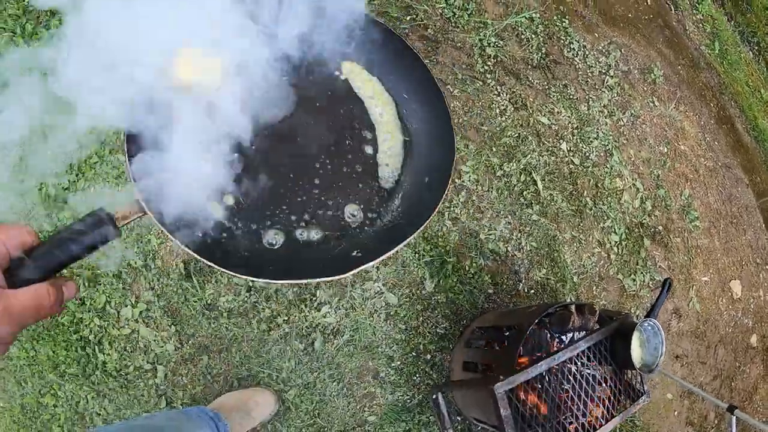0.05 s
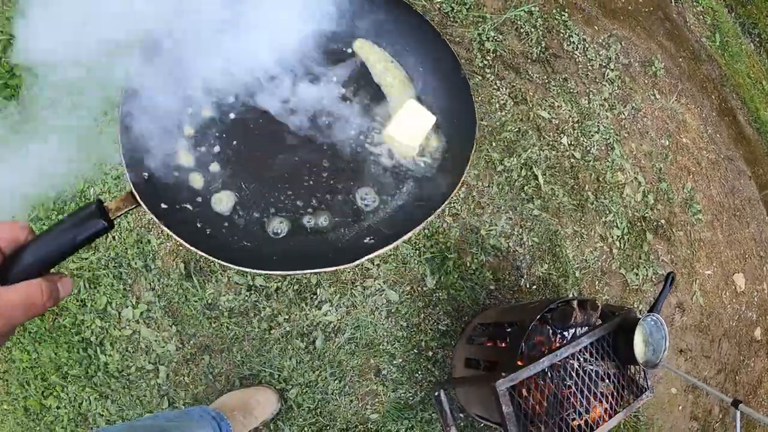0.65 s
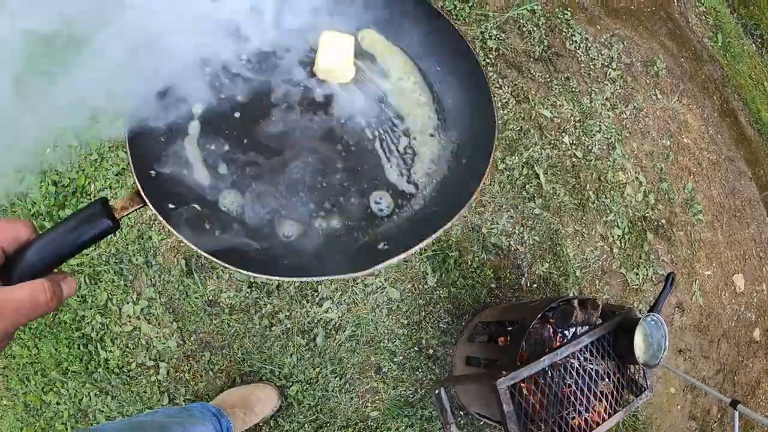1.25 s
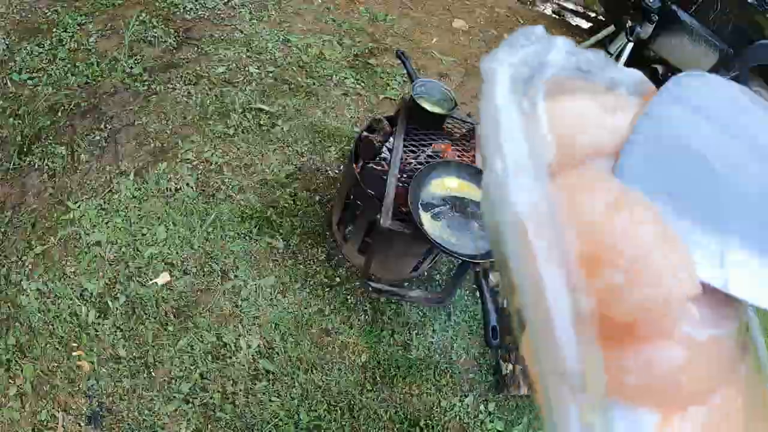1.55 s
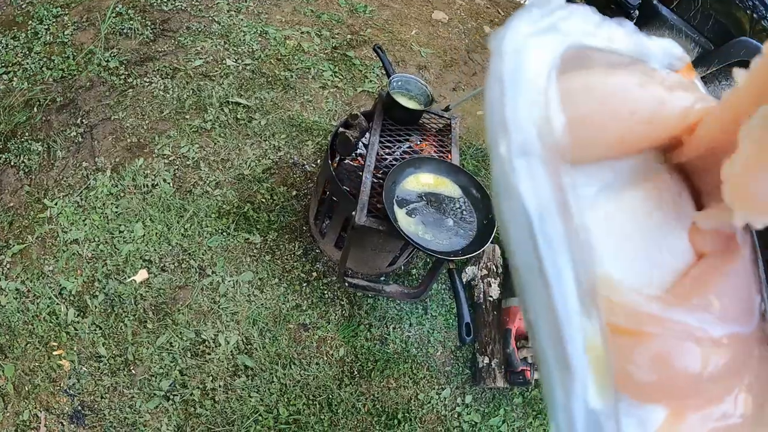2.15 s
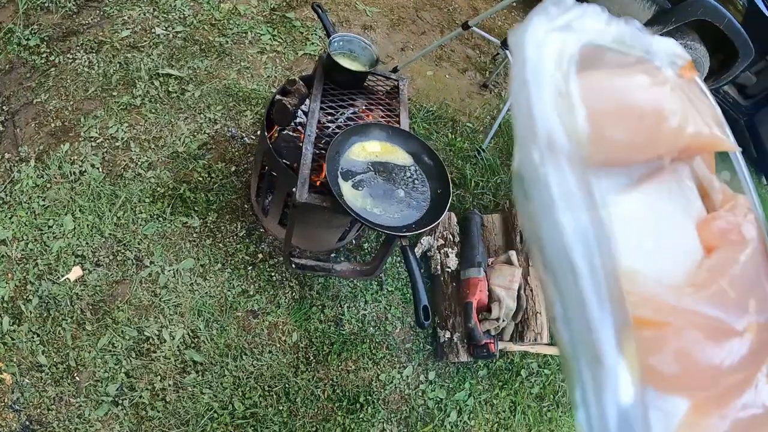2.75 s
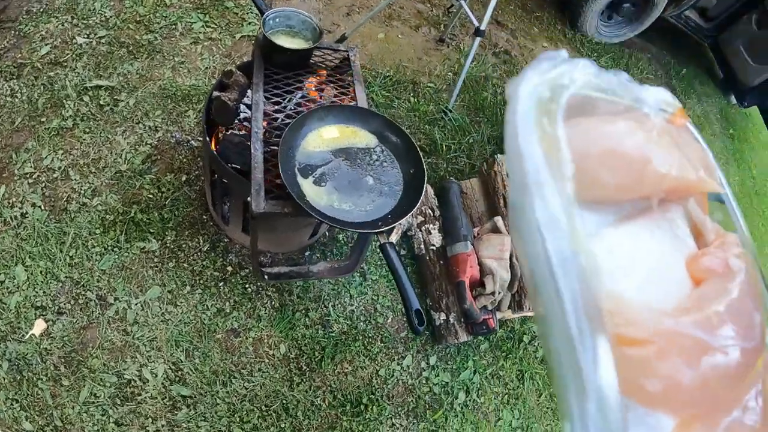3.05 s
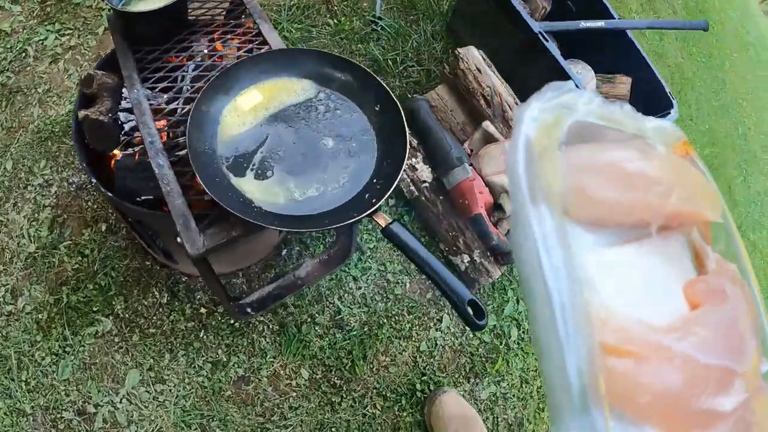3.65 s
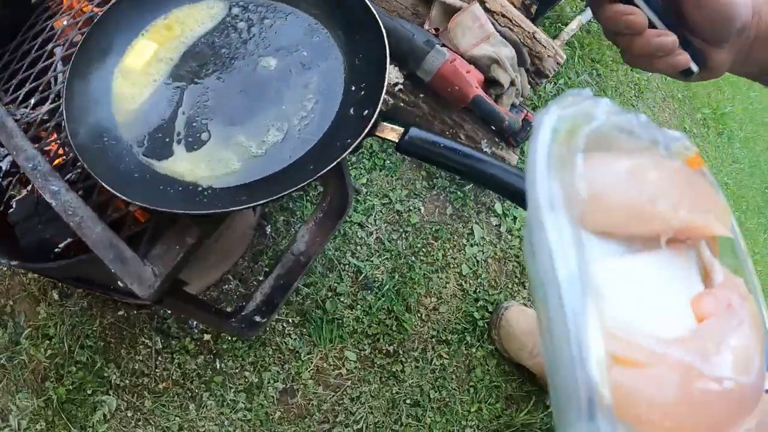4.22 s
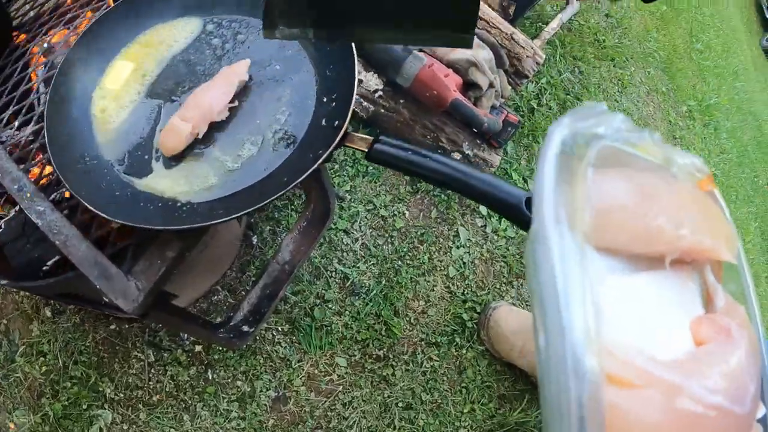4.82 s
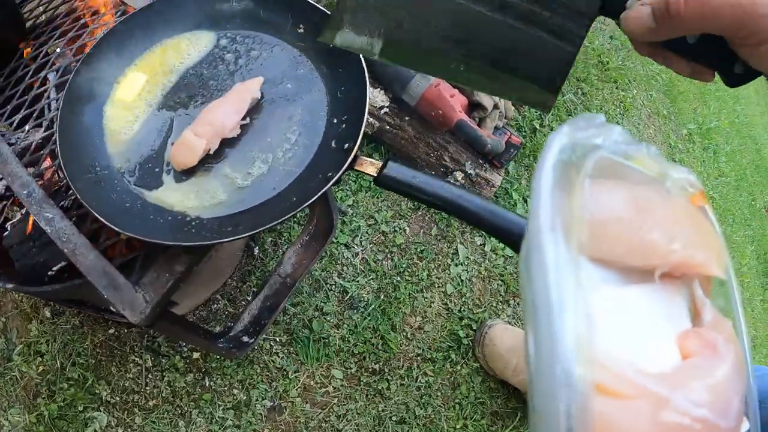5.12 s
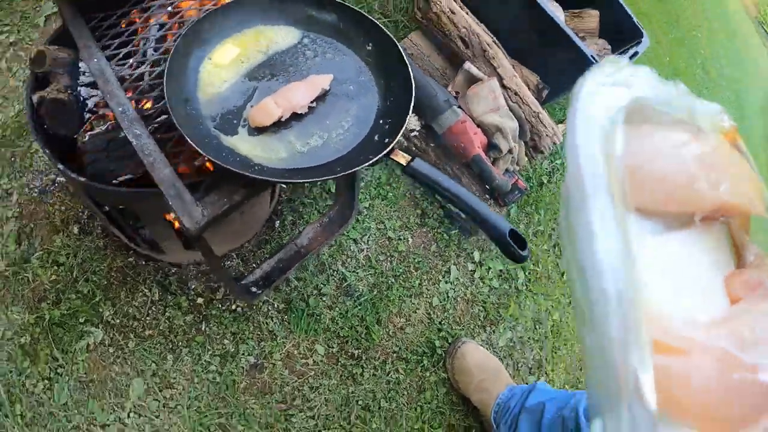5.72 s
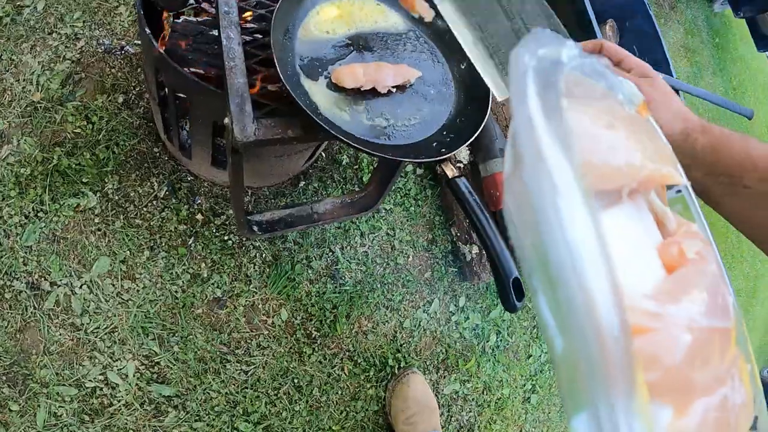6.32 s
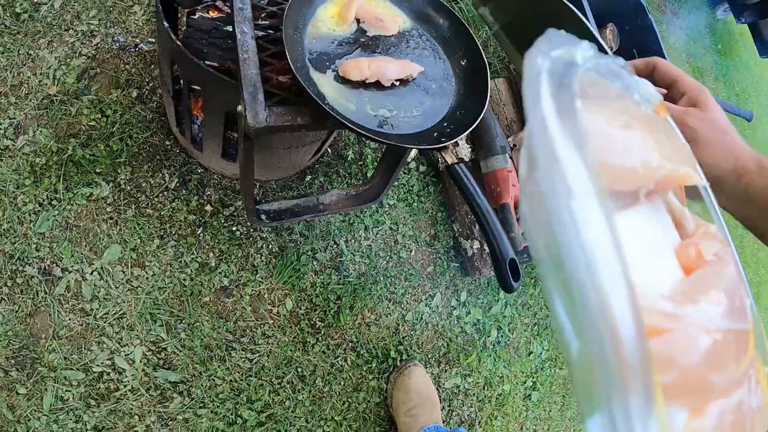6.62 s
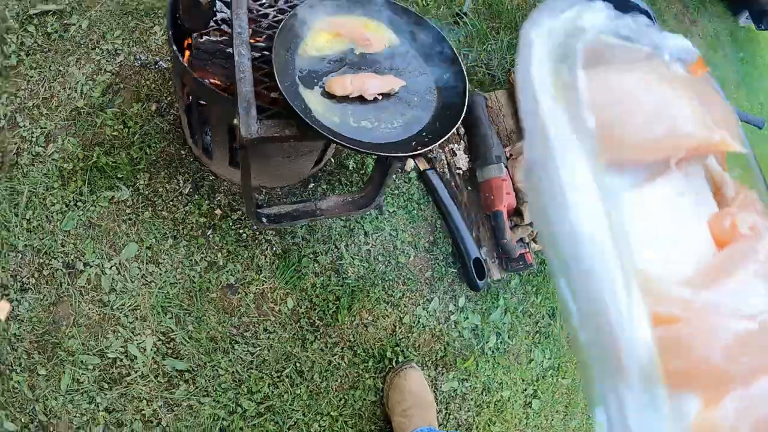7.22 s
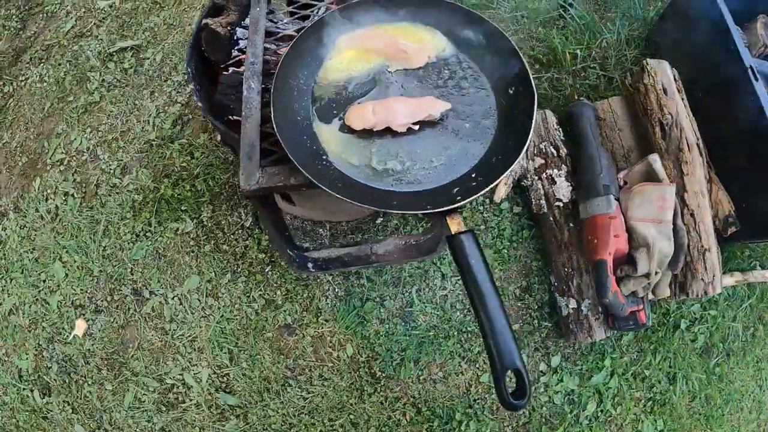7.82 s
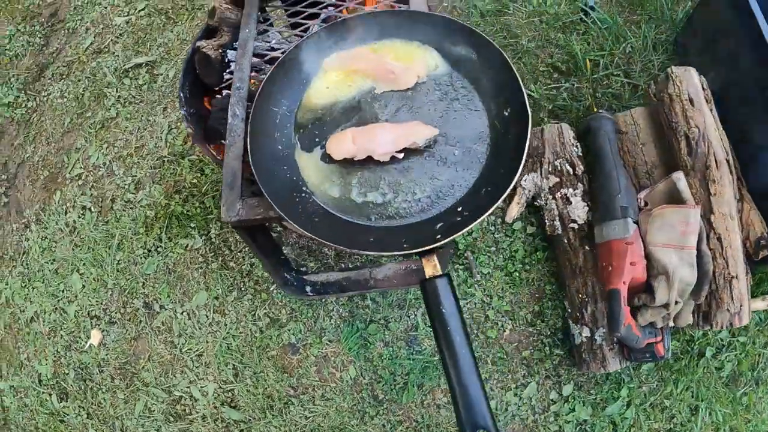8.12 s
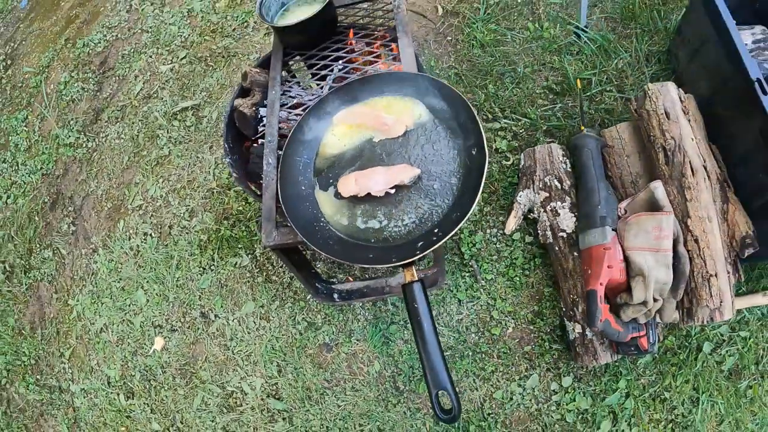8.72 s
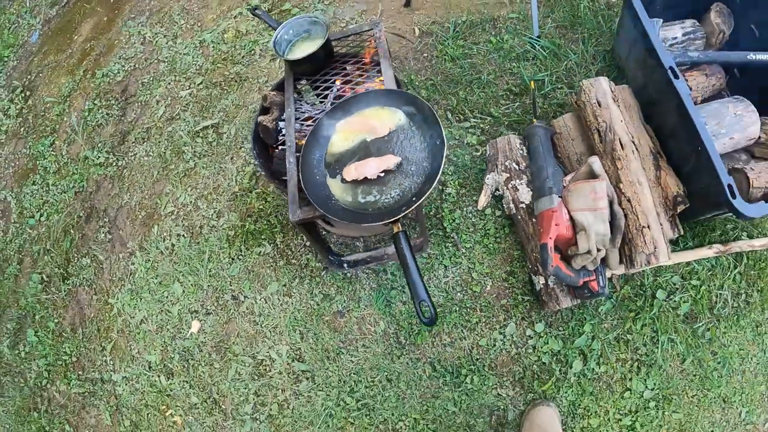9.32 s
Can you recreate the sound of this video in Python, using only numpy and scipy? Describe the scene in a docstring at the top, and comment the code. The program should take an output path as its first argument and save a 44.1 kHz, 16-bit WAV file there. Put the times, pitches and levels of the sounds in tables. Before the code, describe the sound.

Butter sizzles fiercely in a hot skillet, twice skidding with a brief ringing chatter. After a second and a half the sound drops to a softer frying, which flares and slowly builds as chicken cooks and fat spits. Firewood pops, embers tick, and a knife taps the pan once. Outdoors, close to the pan, flames rumble low, wind bumps the microphone midway and a distant engine drones faintly.

```python
"""Butter, then chicken, sizzles in a skillet over a campfire: bursting bubbles over steam hiss.
The butter skids on very hot metal and sets the pan ringing. The chicken fries more gently and
flares as juice meets fat; steam sings, fat spits, a knife taps the pan once.
Air buffets the microphone, flames rumble, a far engine drones, embers tick and firewood pops."""
import sys
import numpy as np
from scipy import signal
from scipy.fft import rfft, irfft, next_fast_len
from scipy.io import wavfile
from scipy.ndimage import uniform_filter1d

SR = 44100
rng = np.random.default_rng(int(sys.argv[2]) if len(sys.argv) > 2 else 0)


def master_out(mix):
    """Clip the mix to full scale and print it as 16-bit PCM to the path in sys.argv[1]."""
    frames = np.transpose(np.atleast_2d(mix))
    ceiling = np.clip(frames, -1, 1)
    pcm = np.round(ceiling * 32767).astype(np.int16)
    wavfile.write(sys.argv[1], SR, pcm)


N = 417186
T = np.arange(N) / SR
HZ = np.maximum(np.fft.rfftfreq(next_fast_len(N, True), 1 / SR), 1)

# Steady frying. Each row: time in seconds, level in dB, tilt about PIVOT_HZ in dB per octave.
BUTTER_LEVELS = [(0.0, -26, -0.751), (1.55, -27.5, -0.95)]
CHICKEN_LEVELS = [(1.805, -48, -1.6), (1.942, -45.5, -0.9), (3.247, -43.5, 0.22), (3.539, -40.0, -0.61),
                  (4.624, -41.5, 0.34), (4.888, -40.5, -1.5), (6.391, -38.5, -0.96), (7.422, -36, -0.084),
                  (7.721, -33.5, -1.15), (9.46, -34, 0.381)]
# Band edges of the six bubble sizes.
BUBBLE_EDGES_HZ = [900, 2000, 2800, 3800, 5200, 8200, 15500]
# Noise spectra. Each row: frequency in Hz, relative density in dB.
BUTTER_SPECTRUM = [(900.0, -11), (1300.0, -12), (1700.0, -6), (2200.0, -6.5), (2600.0, -8.5), (3200.0, -5),
                   (4500.0, -3), (6500.0, 2), (7700.0, 1.7), (8300.0, -4.5), (10000.0, -7.5), (12200.0, -7),
                   (13500.0, -14.5), (15500.0, -25)]
CHICKEN_SPECTRUM = [(900.0, -12), (1400.0, -7), (2000.0, -1.46), (2900.0, -0.26), (3600.0, -3),
                    (4400.0, -2), (5300.0, -6.5), (7500.0, -5.5), (8400.0, -11.5), (10500.0, -12.5),
                    (12100.0, -13.5), (13500.0, -19), (15500.0, -40)]
AIR_SPECTRUM = [(15, -11), (30, -6), (52, 1), (70, -4.5), (100, -7), (160, -16.5), (300, -43), (700, -55)]
ROAR_SPECTRUM = [(50, -23), (90, 0.5), (125, 1), (170, -3), (240, -10), (400, -31.5), (900, -58)]
FLUTTER_SPECTRUM = [(150, -23), (280, 3.5), (400, 1), (600, 0), (800, -3), (1100, -4.5), (2500, -33)]
# Moisture meets hot fat. Each row: centre in seconds, half length in seconds, peak in dB,
# centre in Hz, spread in octaves.
SIZZLE_FLARES = [(0.087, 0.12, -28.5, 6300.0, 1.3), (0.324, 0.0469, -25.5, 5900, 4),
                 (1.37, 0.12, -26.5, 2630.0, 1.7), (2.645, 0.15, -44.5, 6800.0, 1.1),
                 (2.838, 0.03, -39.5, 8000, 2.1), (3.737, 0.083, -31.5, 7400, 0.44),
                 (3.92, 0.083, -33, 7550, 0.37), (4.323, 0.13, -28.5, 7760.0, 0.36),
                 (4.725, 0.047, -29, 7100, 0.55), (5.02, 0.21, -28.5, 6600, 0.75),
                 (5.115, 0.03, -27, 5740, 0.77), (5.384, 0.056, -32, 2500, 0.56),
                 (5.534, 0.28, -31, 5300, 0.77), (5.88, 0.031, -25.5, 5710.0, 0.57),
                 (6.13, 0.11, -30, 6100, 0.8), (6.6, 0.15, -32.5, 5870, 0.8),
                 (6.794, 0.026, -29.5, 6800, 0.43), (6.947, 0.046, -31, 7000, 0.54),
                 (7.146, 0.074, -27.5, 6900, 0.96), (7.38, 0.12, -32.5, 7900, 0.34),
                 (7.656, 0.046, -31.5, 4900, 1.1), (8.097, 0.034, -31.5, 10800.0, 0.79),
                 (8.385, 0.084, -29.5, 4600, 1.5), (8.725, 0.066, -33.5, 5800, 1.9),
                 (9.187, 0.08, -34, 5820.0, 1.2)]
# Butter knocks on the pan. Each row: start in seconds, level in dB, upper-mode offset in dB.
BUTTER_KNOCKS = [(.004, -22, -4), (0.063, -25.5, -5), (0.089, -25.5, -10), (.351, -22, -6),
                 (.364, -18.5, -9), (0.38, -17.5, -8), (.396, -21, -10), (0.411, -10, -2), (.478, -26.5, 3),
                 (1.288, -35, 0), (1.361, -23.5, 2), (1.398, -17.5, 0.5), (1.428, -12.5, 0.5),
                 (1.439, -25.5, 12)]
# Pan modes under butter and knife. Each row: frequency in Hz, gain in dB, T60 in seconds.
SKILLET_MODES = [(461.4, -12, 0.31), (653, -18.5, 0.27), (969, -30, 0.56), (1450, -30, 0.16)]
KNIFE_MODES = [(390, -11, 0.11), (520, -10, .05), (645, -5, 0.06), (963, -1.5, 0.065), (1410, -6, 0.065),
               (1960, 0, 0.031), (3120, 0, .034)]
# Gusts. Each row: centre in seconds, half length in seconds, peak in dB.
AIR_GUSTS = [(4.417, 0.14, -25.5), (4.7, 1.83, -40), (7.4, 0.23, -39.5), (8.44, 0.12, -39)]
# Air thumps. Each row: start in seconds, level in dB, pitch in Hz, left minus right in dB.
AIR_BUFFETS = [(4.081, -19, 34.6, -7), (4.161, -21.5, 45, -3), (4.298, -16, 44.3, -0.5),
               (4.385, -22, 44, -10), (4.453, -31, 75, 1), (4.534, -8.5, 60.6, -5), (5.298, -18, 32.5, -5)]
# Flames surge. Each row: centre in seconds, half length in seconds, roar in dB, flutter in dB.
SURGES = [(.5, 0.54, -62, -48.5), (1.552, 0.3, -43.5, -52), (3.5, 0.23, -43.5, -49.5),
          (4.497, 0.033, -34, -68), (6.417, 0.24, -58, -51.5), (7.597, 0.6, -45.5, -54)]
# Flutter falls away. Each row: centre in seconds, half length in seconds, depth in dB.
FLUTTER_LULLS = [(2.23, 0.066, 11), (3.26, 0.052, 12)]
# Far engine. Each row: time in seconds, level in dB.
ENGINE_LEVELS = [(0, -38.5), (1.53, -35.5), (1.62, -41.5), (3.2, -45), (3.8, -39.5), (5.7, -38.5),
                 (6.1, -49), (9.45, -43)]
# Steam pockets. Each row: centre in seconds, half length in seconds, pitch in Hz, width in Hz, gain.
STEAM_POCKETS = [(2.098, 0.18, 3030, 1450, 0.82), (2.64, 0.37, 2620, 470, 1.35),
                 (4.353, 1, 2300, 400, 0.73), (4.95, 0.15, 1790, 192, 1.3), (5.035, 0.17, 4050, 680, 1.3),
                 (5.55, 0.14, 4040, 320, 0.57), (6.703, 0.34, 3080, 339, 0.64),
                 (8.373, 0.04, 4070, 1200, 0.6), (8.6, 1, 3800, 750, 0.33)]
# Wood pops. Each row: start in seconds, body in dB, body pitch in Hz, crack in dB, crack pitch in Hz.
WOOD_POPS = [(1.8475, -43, 1580, -24.5, 6400), (3.005, -29, 1300, -41, 2300), (3.193, -30, 278, -47, 695),
             (4.453, -29, 292, -48, 500), (6.1902, -16, 1150, -9, 4240), (6.307, -38, 1400, -14.5, 3800),
             (7.349, -31.5, 530, -34, 880), (7.427, -29, 296, -38, 1000), (7.9951, -31, 644, -17, 1270),
             (8.521, -35, 720, -25, 1320)]
# Fat spits. Each row: start in seconds, level in dB, pitch in Hz.
FAT_SPITS = [(2.425, -31, 9800), (2.837, -27, 3530), (3.408, -28, 4900), (5.1134, -21, 3920),
             (5.8387, -24, 4640), (7.104, -24, 3530), (8.278, -22, 4400), (8.3465, -20, 4190)]
# Sizzle direction. Each row: time in seconds, left minus right in dB.
PAN_BEARING = [(0, 0.5), (2, -2), (5.2, 0.6), (6.5, -2), (7.2, -0.5), (7.8, -3), (9.45, -2.5)]
# Stereo width. Each row: frequency in Hz, side over mid in dB.
STEREO_WIDTH = [(25, -32), (60, -47), (125, -28), (400, -6.5), (1000, -11), (2500, -14.5), (7000, -10),
                (10000, -8.5), (13000, -3.5)]
# Balance. Each row: frequency in Hz, left minus right in dB.
STEREO_LEAN = [(60, -5), (1000, 1), (2500, 1.5), (5000, 2), (8500, 2.5), (13000, -0.5)]
# Left-side delay. Each row: frequency in Hz, phase lag in radians.
LEFT_LAG = [(100, 0.14), (2800, 0.63), (7500, 0.57), (10500, 0.098)]
# Brief level dips. Each row: centre in seconds, half length in seconds.
LEVEL_DIPS = [(1.568, 0.036), (5.932, 0.032)]

CHICKEN_START_S = LEVEL_DIPS[0][0]
PIVOT_HZ, CUTOFF_HZ = 4000, 15500


def from_db(db):
    """Decibels to gain."""
    return 10 ** (np.asarray(db) / 20)


def unit_rms(x):
    """Scale to rms 1."""
    return x / np.sqrt(np.mean(x ** 2) + 1e-20)


def in_time(rows):
    """Each column of a time curve, per sample."""
    times_s, *columns = np.transpose(rows)
    return [np.interp(T, times_s, column) for column in columns]


def gains(points):
    """(Hz, dB) points to a gain per FFT bin."""
    hz, db = np.transpose(points)
    return from_db(np.interp(np.log(HZ), np.log(hz), db))


def shaped(x, response):
    """Filter by a frequency response."""
    size = next_fast_len(N, True)
    return irfft(rfft(x, size) * response, size)[..., :N]


def drift(per_s):
    """Random wander, rms 1."""
    knots = rng.standard_normal(4096)
    return unit_rms(np.interp(T * per_s, np.arange(len(knots)), knots))


def bell(t, centre, half):
    """Gaussian of height 1."""
    return np.exp(-((t - centre) / half) ** 2)


def swells_db(steady_db, rows):
    """Steady level plus bell-shaped swells, summed in power."""
    coarse_s = T[::64]
    power = sum(from_db(db) ** 2 * bell(coarse_s, s, half_s) for s, half_s, db in rows)
    return 10 * np.log10(from_db(steady_db) ** 2 + np.interp(T, coarse_s, power))


def ring(x, hz, t60_s):
    """One mode: a unit click starts a decaying unit sine."""
    r, w = from_db(-60 / (t60_s * SR)), 2 * np.pi * hz / SR
    return signal.lfilter([0, np.sin(w)], [1, -2 * r * np.cos(w), r * r], x + 1e-18)


def ring_envelope(pushes, t60_s):
    """Vibration amplitude: rises with each push, decays between."""
    height = signal.lfilter([1], [1, -from_db(-60 / (t60_s * SR))], pushes + 1e-18)
    return uniform_filter1d(height, size=SR // 200)


def bandpass(x, hz, width_hz):
    """Resonance with peak gain 1."""
    r, w = np.exp(-np.pi * width_hz / SR), 2 * np.pi * hz / SR
    return signal.lfilter(np.array([1, 0, -1]) * (1 - r * r) / 2, [1, -2 * r * np.cos(w), r * r], x)


def stereo(pair, response):
    """Two unrelated signals, filtered as mid (rms 1) and side, to left and right."""
    mid, side = shaped(pair[0], response), shaped(pair[1], response * gains(STEREO_WIDTH))
    return np.array([mid + side, mid - side]) / np.std(mid)


def balance(lean_db):
    """Left minus right level to two channel gains."""
    return from_db(lean_db * np.array([[0.5], [-0.5]]))


def strikes(times_s, levels_db, scatter=0, scatter_s=1):
    """Clicks, each with an optional decaying tail of noise."""
    out, age_s = np.zeros(N + SR), np.arange(SR // 10) / SR
    for s, db in zip(times_s, levels_db):
        blow = scatter * rng.standard_normal(len(age_s)) * np.exp(-age_s / scatter_s)
        blow[0] = 1
        at = max(round(s * SR), 0)
        out[at:at + len(blow)] += from_db(db) * blow
    return out[:N]


def bursts(per_s, spread_db):
    """Bubbles burst at random times, strengths and places: mid and side clicks."""
    born = rng.random(N) < per_s / SR
    sizes = from_db(spread_db * np.minimum(rng.exponential(1, N), 4.5)) * rng.choice([-1, 1], N)
    clicks = unit_rms(born * sizes)
    return np.array([clicks, clicks * rng.standard_normal(N)])


def bubble_levels_db(curve):
    """Level per bubble size: steady frying plus the flares near its pitch."""
    level_db, tilt_db = in_time(curve)
    levels_db = []
    for pitch_hz in np.sqrt(np.multiply(BUBBLE_EDGES_HZ[:-1], BUBBLE_EDGES_HZ[1:])):
        flares = [(s, half_s, db - 10 / np.log(10) * (np.log2(pitch_hz / hz) / octaves) ** 2)
                  for s, half_s, db, hz, octaves in SIZZLE_FLARES]
        levels_db.append(swells_db(level_db + tilt_db * np.log2(pitch_hz / PIVOT_HZ), flares))
    return levels_db


def frying(levels_db, spectrum, per_s, spread_db, hiss, flicker_db):
    """Six bubble sizes burst, each in its own band, over the hiss of escaping steam."""
    out, surge, colour = 0, drift(60), unit_rms(gains(spectrum))
    splashes = bursts(per_s / 2, spread_db)   # common to all bands
    for level_db, low_hz, high_hz in zip(levels_db, BUBBLE_EDGES_HZ, BUBBLE_EDGES_HZ[1:]):
        grains = bursts(per_s, spread_db) + 0.5 * splashes + hiss * rng.standard_normal((2, N))
        band = colour / np.sqrt((1 + (low_hz / HZ) ** 14) * (1 + (HZ / high_hz) ** 14))
        share = np.sqrt(np.mean(band ** 2))
        out += stereo(grains, band) * share * from_db(level_db + flicker_db * (surge + drift(70)))
    return out


def bubble_clusters(x):
    """Clusters of like-sized bubbles come and go: narrow bands wax and wane."""
    return x + sum(0.23 * drift(7) * bandpass(x, hz, 0.057 * hz) for hz in np.geomspace(1400, 12000, 20))


def sizzle():
    """Butter sears fiercely and evenly; then chicken crackles more loosely."""
    butter_db, chicken_db = bubble_levels_db(BUTTER_LEVELS), bubble_levels_db(CHICKEN_LEVELS)
    butter = frying(butter_db, BUTTER_SPECTRUM, per_s=9000, spread_db=1, hiss=0.89, flicker_db=0.44)
    chicken = frying(chicken_db, CHICKEN_SPECTRUM, per_s=2800, spread_db=3.3, hiss=0.7, flicker_db=0.6)
    drops = from_db(np.mean(chicken_db, axis=0) - 14) * droplets()
    chicken = singing_steam(chicken) + drops + fat_spits()
    fat = np.where(T < CHICKEN_START_S, butter, chicken)
    return bubble_clusters(fat * balance(in_time(PAN_BEARING)[0]))


def skillet():
    """Steam under skidding butter chatters and pushes the pan's modes in step; the butter damps them."""
    damped_t60_s = 0.088
    times_s, levels_db, upper_db = np.transpose(BUTTER_KNOCKS)
    low_pushes, upper_pushes = strikes(times_s, levels_db), strikes(times_s, levels_db + upper_db)
    tones = 0
    for k, (hz, db, t60_s) in enumerate(SKILLET_MODES):
        cycles = hz * np.cumsum(1 + 0.008 * drift(60)) / SR   # the sliding load bends the pitch
        pushes = upper_pushes if k else low_pushes
        envelope = ring_envelope(pushes, t60_s) + ring_envelope(pushes, damped_t60_s)
        tones += from_db(db) * envelope * np.sin(2 * np.pi * cycles)
    chatter = unit_rms(bandpass(bandpass(rng.standard_normal(N), 500, 260), 480, 400))
    chatter *= from_db(-12) * ring_envelope(low_pushes, damped_t60_s)
    return (tones + chatter) * (T < CHICKEN_START_S)


def rumble(level_db, spectrum):
    """Coloured stereo noise."""
    return from_db(level_db) * stereo(rng.standard_normal((2, N)), gains(spectrum))


def flames(roar_db=-47, flutter_db=-57, waver_db=2.35):
    """Flames surge with a wavering roar and a higher flutter."""
    roar = swells_db(roar_db, [(s, half_s, db) for s, half_s, db, _ in SURGES])
    flutter = swells_db(flutter_db, [(s, half_s, db) for s, half_s, _, db in SURGES])
    flutter -= sum(db * bell(T, s, half_s) for s, half_s, db in FLUTTER_LULLS)
    return rumble(roar + waver_db * drift(6.3), ROAR_SPECTRUM) + rumble(flutter, FLUTTER_SPECTRUM)


def wind(breeze_db=-43.5):
    """Air rumbles in gusts, eddies separately on each side and thumps in soft buffets."""
    level_db = swells_db(breeze_db, AIR_GUSTS)
    air = rumble(level_db, AIR_SPECTRUM)
    eddies = 0.5 * from_db(level_db) * unit_rms(shaped(rng.standard_normal((2, N)), gains(AIR_SPECTRUM)))
    buffets = sum(ring(strikes([s], [db], scatter=0.012, scatter_s=0.01), hz, 4.5 / hz) * balance(lean_db)
                  for s, db, hz, lean_db in AIR_BUFFETS)
    return air + eddies + signal.sosfilt(signal.butter(2, 170, fs=SR, output="sos"), buffets)


def engine(hz=103.5):
    """A far engine drones on one wavering note."""
    cycles = np.cumsum(hz * (1 + 0.013 * drift(5))) / SR
    return from_db(in_time(ENGINE_LEVELS)[0] + 0.48 * drift(18)) * np.sin(2 * np.pi * cycles)


def embers(per_s=4.4, level_db=-39.5, spread_db=7):
    """Embers tick at random times, strengths and pitches."""
    when, strength, pitch = rng.random((int(per_s * N / SR), 3)).T
    times_s, levels_db = when * N / SR, level_db + spread_db * (2 * strength - 1)
    pitches_hz, out = np.geomspace(600, 2400, 6), 0
    for k, hz in enumerate(pitches_hz):
        chosen = (pitch * len(pitches_hz)).astype(int) == k
        ticks = strikes(times_s[chosen], levels_db[chosen], scatter=0.043, scatter_s=0.004)
        out += ring(ticks, hz, 6 / hz)
    return out


def droplets():
    """Water drops burst in the fat; each rings a few cycles at its own pitch."""
    drops, pitches_hz = bursts(per_s=120, spread_db=1)[0], np.geomspace(1900, 7500, 20)
    choice = rng.integers(0, len(pitches_hz), N)
    return unit_rms(sum(ring(drops * (choice == k), hz, 15 / hz) for k, hz in enumerate(pitches_hz)))


def firewood():
    """Wood pops: a hollow knock and a sharp crack with a broad snap, trailed by splintering."""
    pops = 0
    for s, body_db, body_hz, crack_db, crack_hz in WOOD_POPS:
        knock = strikes([s], [body_db], scatter=0.028, scatter_s=0.0063)
        crack = strikes([s], [crack_db], scatter=0.19, scatter_s=0.0033)
        snap = from_db(5) * bandpass(crack, crack_hz, crack_hz)
        pops += ring(knock, body_hz, 7.6 / body_hz) + ring(crack, crack_hz, 6 / crack_hz) + snap
    return signal.sosfilt(signal.butter(2, [250, 8000], "band", fs=SR, output="sos"), pops)


def singing_steam(x):
    """Steam pockets open and close, each lifting one band of the sizzle."""
    return x + sum(gain * bell(T, s, half_s) * bandpass(x, hz, width_hz)
                   for s, half_s, hz, width_hz, gain in STEAM_POCKETS)


def fat_spits():
    """Fat spits in single, briefly ringing clicks."""
    return sum(ring(strikes([s], [db], scatter=0.043, scatter_s=0.0016), hz, 15 / hz)
               for s, db, hz in FAT_SPITS)


def knife(start_s=6.4767, crack_db=-7.5, ring_db=-23):
    """The blade taps the pan: a hard crack, then a ring damped by the meat."""
    blow = strikes([start_s], [0], scatter=0.012, scatter_s=0.004)
    crack = from_db(crack_db) * ring(blow, hz=2300, t60_s=0.0047)
    return crack + sum((-1) ** k * from_db(ring_db + db) * ring(blow, hz, t60_s)
                       for k, (hz, db, t60_s) in enumerate(KNIFE_MODES))


def scene():
    """Pan and wood almost straight ahead, a shade later on the left; flames, wind and engine added."""
    near = sizzle() + skillet() + firewood() + embers() + knife()
    lean = np.sqrt(gains(STEREO_LEAN))
    lag = np.exp(-1j * np.interp(HZ, *np.transpose(LEFT_LAG)))
    return shaped(near, np.array([lean * lag, 1 / lean])) + flames() + wind() + engine()


def record(dry):
    """The level dips briefly twice; a steep low-pass cuts the top."""
    dips = np.prod([np.clip(np.abs(T - s) / half_s, 0.03, 1) ** 1.61 for s, half_s in LEVEL_DIPS], axis=0)
    return signal.sosfilt(signal.ellip(10, 0.1, 80, CUTOFF_HZ, fs=SR, output="sos"), dry * dips)


dry = scene()
out = record(dry)
master_out(out)
```